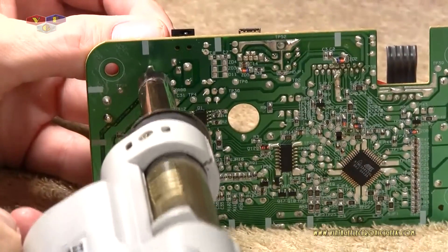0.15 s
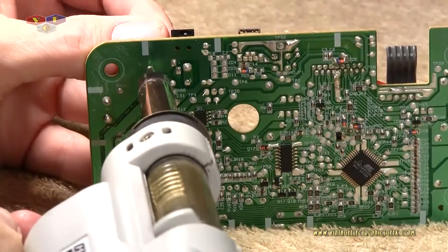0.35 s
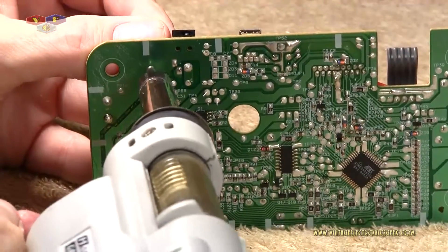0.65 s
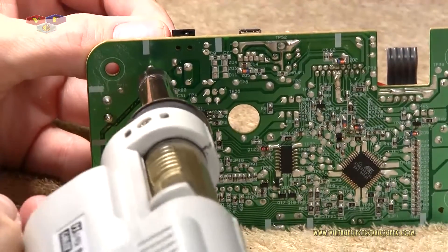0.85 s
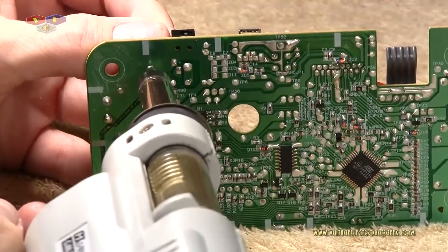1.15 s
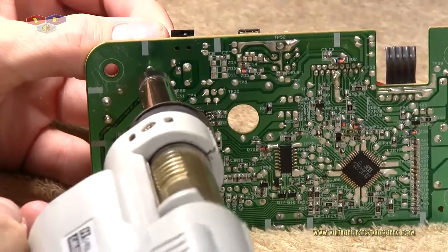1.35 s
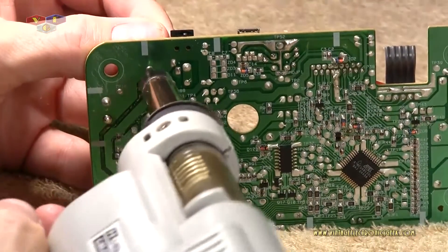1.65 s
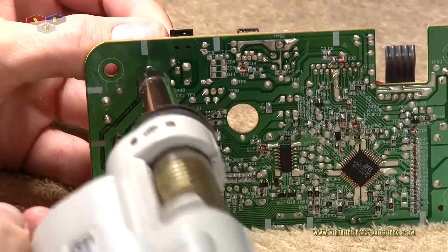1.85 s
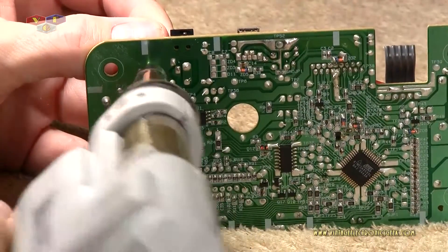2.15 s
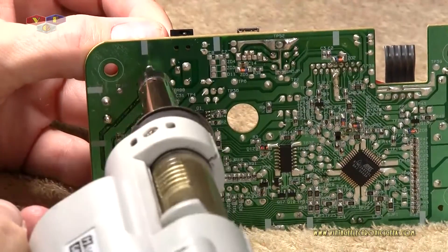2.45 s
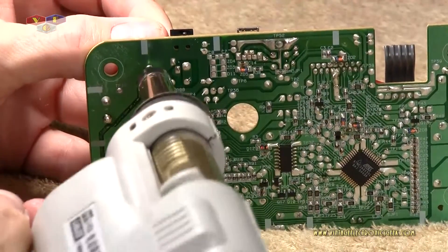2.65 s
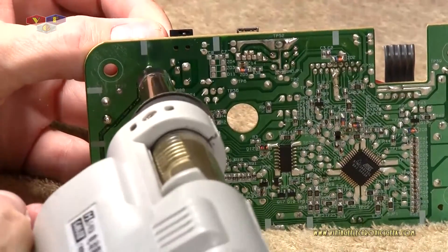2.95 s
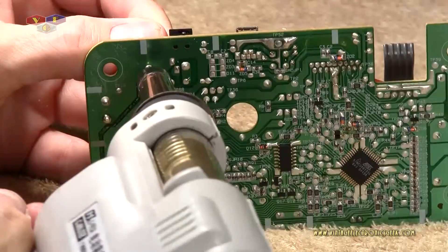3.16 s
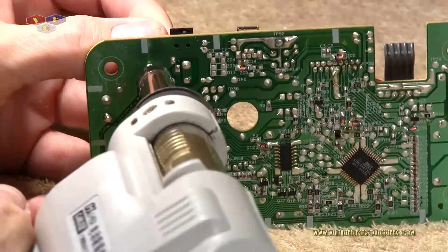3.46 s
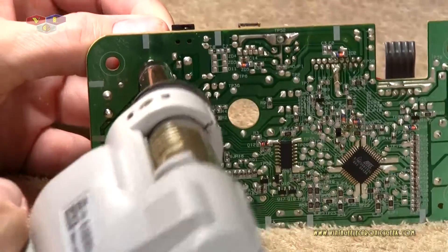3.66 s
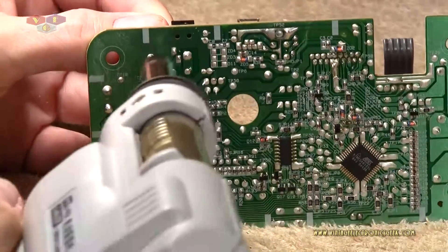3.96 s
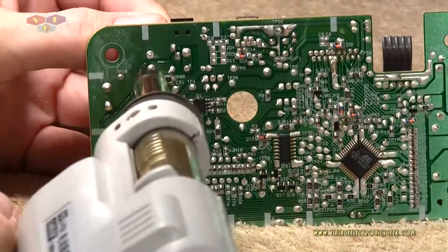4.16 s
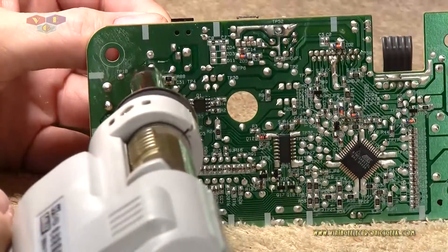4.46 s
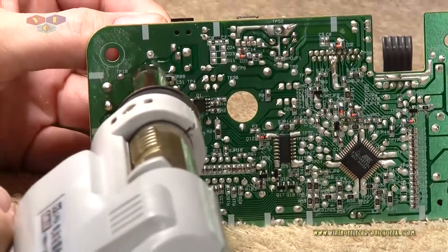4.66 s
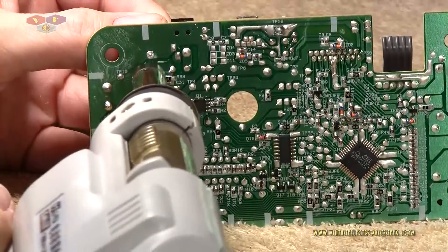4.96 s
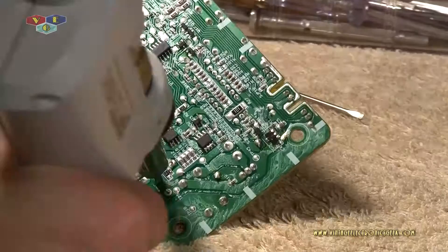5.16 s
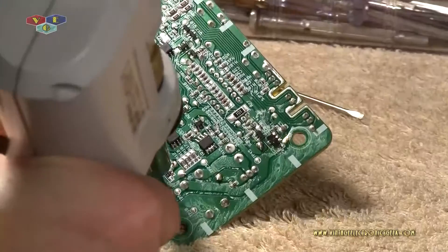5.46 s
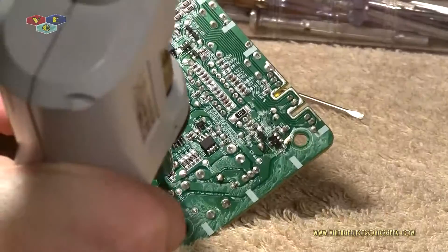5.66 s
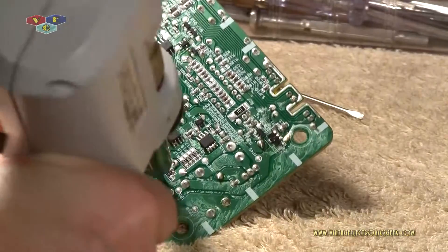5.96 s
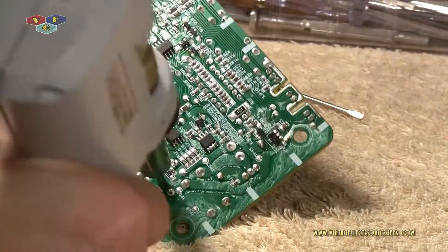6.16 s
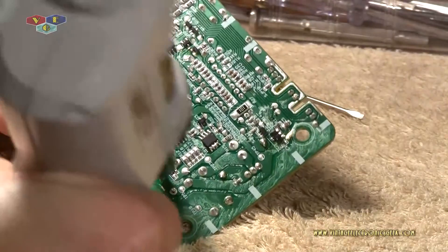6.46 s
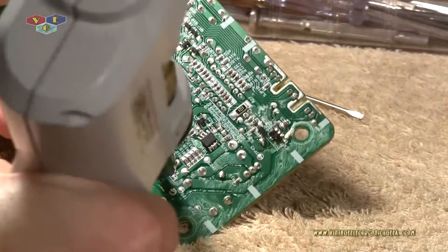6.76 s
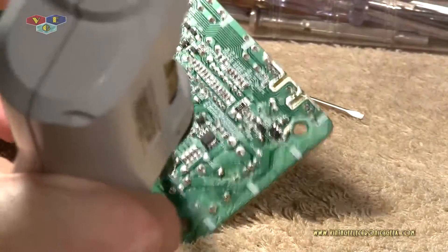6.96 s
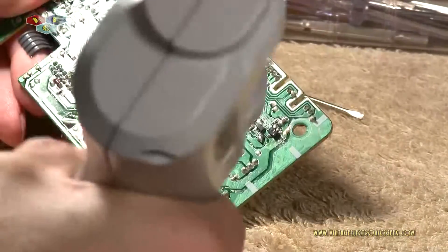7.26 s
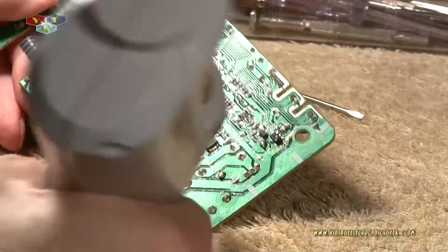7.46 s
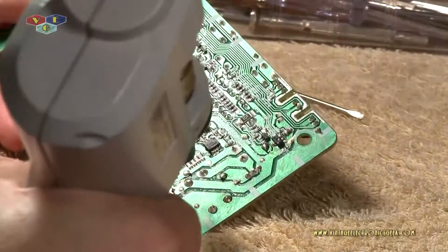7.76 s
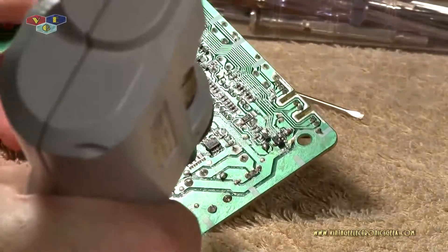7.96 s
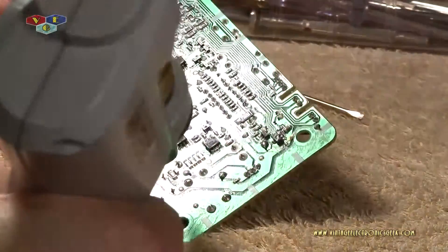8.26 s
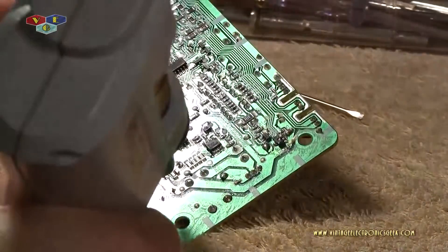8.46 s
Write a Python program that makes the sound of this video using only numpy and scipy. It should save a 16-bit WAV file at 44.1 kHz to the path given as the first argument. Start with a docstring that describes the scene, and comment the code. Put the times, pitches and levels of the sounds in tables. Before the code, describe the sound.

A faint fan hum runs throughout in a small, dry workroom. At about 0.4 seconds a trigger clicks and an electric desoldering gun kicks on with a knock, close to the microphone. Its vacuum pump gives a loud, low buzz of rapid hollow thumps, plastic clatter and air puffs, coasting out by 1 second. Faint circuit board taps come near 1.8 and 2.1 seconds. At 2.7 seconds a click and knock start a second burst, which whistles thinly and labours twice, around 3.1 and 3.4 seconds, as solder plugs the nozzle, then winds down by 3.7. Several light taps follow between 3.8 and 5.2 seconds. After small trigger clicks, the longest burst starts sharply at 5.7 seconds, steadier and slightly different in tone. It slows at 7 seconds and ends in a few weak strokes, leaving only the hum until about 8.5 seconds.

```python
"""An electric desoldering gun runs its diaphragm pump in three bursts, close to a stereo microphone.
Each motor turn thumps the chamber, clacks the valves against the plastic shell and puffs air. The motor
kicks at the start, labours when solder plugs the nozzle and coasts out in a few slow strokes.
The microphone hears two bursts from the gun's top, the last from its side. In between, the trigger
clicks and the nozzle taps the board. Behind it all lies the fan hum of a small workroom."""
import sys
import numpy as np
from scipy import signal
from scipy.fft import rfft, irfft
from scipy.io import wavfile
from scipy.ndimage import uniform_filter1d, minimum_filter1d

SR = 44100
rng = np.random.default_rng(int(sys.argv[2]) if len(sys.argv) > 2 else 0)


def log_audio(samples):
    """Write samples as a 16-bit WAV file to the path given in sys.argv[1]."""
    # one column per channel
    frames = np.atleast_2d(samples).T
    # limit to full scale, then quantise
    limited = np.clip(frames, -1, 1)
    pcm = np.round(limited * 32767).astype(np.int16)
    wavfile.write(sys.argv[1], SR, pcm)


N = 379260
TIME = np.arange(N) / SR

# trigger pulls: first_stroke_s, power_off_s, cruise_hz, climb_hz_per_s, coast_s, rock_gap_s, rock_step_db
BURSTS = [(.4458, .7601, 55.58, 10.16, .1713, .022, -4), (2.7348, 3.4714, 58.05, .09, .1593, .0225, -3.5),
          (5.6875, 7.0084, 57.89, .2, .1169, .035, -8.5)]
# solder plugs dragging the motor down: centre_s, half_length_s, speed_lost_share
PLUGS = [(3.1347, .0352, .3455), (3.3538, .032, .2973), (6.95, .2664, .035)]
# chamber thump, one curve a burst: time_s, relative_db
THUMP_CURVES = [
    [(0.44, -16), (0.444, -14.5), (0.604, -17.5), (0.618, -18.5), (0.652, -18.5), (0.82, -16)],
    [(2.73, -15), (2.978, -21), (3.056, -17), (3.114, -18.5), (3.23, -15), (3.406, -17.5), (3.512, -13),
     (3.53, -16.5)],
    [(5.68, -16), (5.786, -12), (5.914, -18), (5.99, -15), (6.156, -17.5), (6.216, -13.5), (6.236, -16.5),
     (7.04, -14.5)],
]
# inlet valve, piston, outlet valve, diaphragm return: place_turns, thump_db, clatter_db, hiss_db, decay_s
KNOCKS_TOP = [(-.2, -8.5, -3, -0.5, .0025), (0, 0, -1, -5, .0014), (.2, -10, -9, 1, 0.003),
              (.44, -8, -9.5, -13, 0.0047)]
KNOCKS_SIDE = [(-.21, -5.5, -1, -12.5, 0.0051), (0, 0.5, -1, -1, 0.0019), (.2, -10, -8, -2, .004),
               (0.458, -8.5, -7.5, -11.5, 0.0034)]
# colours of chamber, shell and valve hiss from each microphone position: frequency_hz, relative_db
CHAMBER_TOP = [(30, -35), (57, -26.5), (115, -17), (175, -18), (230, -27.5), (290, -19), (400, -10),
               (510, -6), (580, -11), (640, -1), (720, 1.5), (790, 0), (870, -13), (1050, -34), (1600, -40)]
CHAMBER_SIDE = [(30, -49), (57, -27), (115, -21), (175, -18.5), (230, -26.5), (290, -20), (400, -7.5),
                (520, -9.5), (590, -6.5), (640, 2.5), (700, 5.5), (775, 4.5), (870, -12), (1050, -14),
                (1600, -37)]
SHELL_TOP = [(560, -59), (950, -0.5), (1020, 3), (1100, -2.5), (1400, -3.5), (1850, 2), (2180, -9.5),
             (2400, 2), (3030, -8.5), (4350, -5.5), (4700, -6), (5130, -3.5), (6200, -12.5), (6760, -10),
             (7500, -22.5), (9750, -72), (16500, -120)]
SHELL_SIDE = [(530, -35.5), (900, -9), (1120, -3.5), (1370, -10.5), (1530, -2.5), (1700, -9.5), (1910, -1),
              (2220, -10.5), (2450, -6), (2950, -10.5), (3620, -10), (4560, -16), (5310, -13), (6230, -23),
              (7500, -22.5), (9750, -63), (16500, -120)]
HISS_TOP = [(4120, -56), (7000, -7), (8320, -4.5), (9760, 0), (11900, -8.5), (13600, -6.5), (15300, -28),
            (16000, -5)]
HISS_SIDE = [(4120, -15), (7000, -4.5), (8150, -2), (9140, 4.5), (11600, -10), (13600, -7), (15200, -31),
             (16000, -28)]
# air singing in the half-plugged nozzle: centre_s, length_s, pitch_hz, band_gain_db
WHISTLES = [(2.918, .2, 5280, -2), (3.178, 0.037, 2650, -3), (3.377, 0.065, 2600, -1)]
# jerks of the starting motor, and the sharp first valve knock of the last burst: start_s, level_db, decay_s
START_KNOCKS = [(0.417, -4.5, 0.0013), (2.7002, -14.5, 0.0056), (2.7098, -8, 0.004), (5.6538, -4.5, 0.0021),
                (5.679, -18.5, .004)]
# trigger clicks: start_s, level_db
CLICKS = [(0.4105, -23), (2.6922, -20), (5.4472, -25.5), (5.630, -23), (5.649, -19)]
# colours of the start knocks and of the trigger: frequency_hz, relative_db
START_COLOUR = [(20, -29), (60, -19), (150, -14), (300, -8), (520, 5.5), (750, 8.5), (1080, 2.5),
                (1350, -3), (1800, -1.5), (2500, -7.5), (4500, -7.5), (7000, -22), (10000, -19.5),
                (16000, -34)]
TRIGGER_COLOUR = [(300, -36), (900, 5.5), (1500, 6.5), (2300, 10), (2900, 2), (3700, -16), (7000, -5.5),
                  (10000, -16), (16000, -22)]
# taps on the board: start_s, level_db, pitch_hz, decay_s
TAPS = [(1.799, -38.5, 694, 0.013), (2.138, -47, 1900, .004), (3.752, -42.5, 3000, .005),
        (4.044, -33.5, 684, 0.0094), (4.486, -38, 870, 0.0039), (5.148, -39, 1090, .003),
        (5.494, -54, 1500, .005)]
# workroom decay: frequency_hz, t60_s
ROOM_DECAY = [(250, .18), (660, .16), (1700, .2), (4600, .205), (14000, .19)]
# strength of the reflections: frequency_hz, gain_db
REFLECTIONS = [(100, -20), (700, -18), (1500, -12), (5000, -9), (14000, -10)]
# fan and mains tones: pitch_hz, level_db, width_hz, start_s
HUM_TONES = [(56.3, -72, 0.33, 1.5), (178, -64, 5.23, -1.5), (204, -59.5, 2.8, 0.5), (376, -66, 1.3, 0),
             (414, -64, 1.4, 0), (615, -79, 4, -0.5), (1200, -63, 37.2, 0), (1430, -63, 6.6, 5)]
# colour of the room's air: frequency_hz, relative_db
AIR_COLOUR = [(15, -52), (25, -28), (97, -3), (145, -9.5), (161, -3.5), (212, -1.5), (326, -10), (354, -5),
              (451, -11.5), (575, -7), (887, -11.5), (1190, -11.5), (1700, -18), (11600, -29.5),
              (16000, -34)]
# how far the two microphone ports differ: frequency_hz, gain_db
PORT_SPREAD = [(40, -22), (250, -95), (550, -33.5), (1200, -59), (4000, -105), (14000, -59)]


def gun():
    """The running gun at close range, microphone first over its top and then at its side."""
    rows = np.vstack([strokes(burst, curve) for burst, curve in zip(BURSTS, THUMP_CURVES)])
    from_top = rows[:, 0] < 5.2  # seconds
    top = pump(rows[from_top], KNOCKS_TOP, CHAMBER_TOP, SHELL_TOP, HISS_TOP, thump_db=29, clatter_db=8.5,
               hiss_db=-8, loose_share=.14, hiss_s=.0033, rise_s=.00027, drift=.09)
    side = pump(rows[~from_top], KNOCKS_SIDE, CHAMBER_SIDE, SHELL_SIDE, HISS_SIDE, thump_db=28.5,
                clatter_db=7.5, hiss_db=-4, loose_share=.37, hiss_s=.0012, rise_s=.00039, drift=.08)
    return nozzle_whistle(top + side)


def pump(rows, knocks, chamber, shell, hiss, thump_db, clatter_db, hiss_db,
         loose_share, hiss_s, rise_s, drift, jitter_s=.00006, chirp_hz=914):
    """Each knock booms the chamber, rings the shell's dense modes and puffs air through a valve."""
    stroke_s, stroke_thump_db, stroke_clatter_db, length_s = rows.T
    thump, clatter, air = np.zeros((3, N))
    for place, knock_thump_db, knock_clatter_db, knock_hiss_db, decay_s in knocks:
        slip, suction, *scatter = rng.standard_normal((len(rows), 5)).T
        boom_db, clack_db, gust_db = np.array(scatter) * [[.8], [.8], [1.5]]
        # the valves open earlier or later as the suction drifts
        suction = unit_rms(uniform_filter1d(suction, size=7))
        times = stroke_s + place * length_s * (1 + drift * suction) + jitter_s * slip
        thump += impulses(times, stroke_thump_db + knock_thump_db + boom_db)
        shell_db = stroke_clatter_db + knock_clatter_db + clack_db
        valve_db = stroke_clatter_db + knock_hiss_db + gust_db
        # the shell answers alike at every turn; loose parts rattle anew each time
        clatter += np.sqrt(1 - loose_share) * through(impulses(times, shell_db), modes(decay_s, rise_s))
        for s, rattle_db, air_db in zip(times, shell_db, valve_db):
            add(clatter, s, np.sqrt(loose_share) * amp(rattle_db) * puff(decay_s, rise_s))
            add(air, s, amp(air_db) * puff(hiss_s, 2 * rise_s))
    # the chamber shrinks during a stroke, so its upper tones come late and each thump chirps upward
    thump -= 2 * signal.lfilter(*signal.iirpeak(chirp_hz, Q=2.36, fs=SR), thump)
    return (amp(thump_db) * through(thump, body(chamber))
            + amp(clatter_db) * through(clatter, body(shell))
            + amp(hiss_db) * through(air, body(hiss)))


def strokes(burst, thump_curve, surge_s=.078, freed_delay_s=.06, freed_half_s=.048, longest_s=.022):
    """One stroke a motor turn, then the piston settles. Rows: time_s, thump_db, clatter_db, length_s."""
    *motor, rock_gap_s, rock_step_db = burst
    start_s, off_s, _, _, coast_s = motor
    t = np.arange(start_s, off_s + coast_s, 1 / SR)
    turns = np.cumsum(motor_speed(t, *motor)[0]) / SR
    times = np.interp(np.arange(int(turns[-1]) + 1), turns, t)
    speed_hz, spent = motor_speed(times, *motor)
    slack = np.minimum(spent / .19, 1)  # without power the strokes weaken
    thump_db = np.interp(times, *np.transpose(thump_curve)) - 4 * slack
    # the shell clatters harder just after the start, and again as a plug lets go
    surge = np.exp(-(times - start_s) / surge_s)
    freed = sum(lost * np.exp(-((times - s - freed_delay_s) / freed_half_s) ** 2) for s, _, lost in PLUGS)
    clatter_db = 1.5 * surge + 5 * freed - 2 * slack
    rows = np.column_stack([times, thump_db, clatter_db, np.minimum(1 / speed_hz, longest_s)])
    rocks = piston_rocks(times[-1], thump_db[-1], clatter_db[-1], rock_gap_s, rock_step_db)
    return np.vstack([rows[:-1], rocks])


def motor_speed(t, start_s, off_s, cruise_hz, climb_hz_per_s, coast_s, spin_up_s=.0355):
    """The motor spins up, labours at plugs and coasts. Gives turns a second and share lost to coasting."""
    spin_up = 1 - .201 * np.exp(-(t - start_s) / spin_up_s)
    load = np.prod([1 - lost * np.exp(-((t - s) / half_s) ** 2) for s, half_s, lost in PLUGS], axis=0)
    spent = np.clip((t - off_s) / coast_s, 0, 1) ** 2
    free_hz = cruise_hz + climb_hz_per_s * (t - start_s)
    return free_hz * spin_up * load * (1 - spent), spent


def piston_rocks(s, thump_db, clatter_db, gap_s, step_db):
    """The piston tips over once more and rocks back twice; the clatter dies faster than the thump."""
    return [(s + k * gap_s, thump_db - 2.5 + k * step_db, clatter_db - 2.2 + 1.85 * k * step_db,
             .47 * gap_s) for k in range(3)]


def nozzle_whistle(pumping):
    """Molten solder narrows the nozzle, which then rings at one pitch for a moment."""
    out = pumping.copy()
    for centre_s, length_s, hz, db in WHISTLES:
        swell = np.cos(np.pi * np.clip((TIME - centre_s) / length_s, -.5, .5))
        out += amp(db) * swell * signal.lfilter(*signal.iirpeak(hz, Q=12, fs=SR), pumping)
    return out


def start_knocks():
    """Broad blows: the starting motor jerks the gun, and the last burst's first valve knock is sharp."""
    out = np.zeros(N)
    for s, db, decay_s in START_KNOCKS:
        knock = through(modes(decay_s, rise_s=.00014), body(START_COLOUR))
        add(out, s, amp(db) * np.sqrt(SR / 100) * knock)  # level as rms over 10 ms
    return out


def trigger_clicks():
    """The trigger switch snaps just ahead of each burst."""
    out = np.zeros(N)
    for s, db in CLICKS:
        snap = through(modes(decay_s=.0028, rise_s=.00005), body(TRIGGER_COLOUR))
        add(out, s, amp(db) * snap / abs(snap).max())
    return out


def board_taps():
    """Nozzle and fingers tap the board, which answers with a short dull ring."""
    out = np.zeros(N)
    for s, db, hz, decay_s in TAPS:
        colour = [(hz / 4, -24), (hz / 1.3, -13), (hz, 0), (hz * 1.3, -15),
                  (hz * 3, -22), (hz * 7, -33), (hz * 16, -46)]
        tap = through(modes(decay_s, rise_s=.0001), body(colour))
        add(out, s, amp(db) * tap / abs(tap).max())
    return out


def workroom(direct, size=20000, echoes_per_s=3000, first_echo_s=.005):
    """Bench and walls send sparse reflections to the microphone, each band dying at its own speed."""
    echoes = rng.choice([-1., 1.], size) * (rng.random(size) < echoes_per_s / SR)
    echoes *= TIME[:size] > first_echo_s
    hz, t, bands = signal.stft(echoes, SR, nperseg=256)
    bands *= amp(-60 * t / at_hz(ROOM_DECAY, hz)[:, None])
    plain = signal.istft(bands, SR, nperseg=256)[1]
    tail = signal.istft(bands * amp(at_hz(REFLECTIONS, hz))[:, None], SR, nperseg=256)[1]
    return direct + through(direct, tail / np.linalg.norm(plain))


def fan_hum():
    """Fans and mains hum in the background, each tone wavering in phase."""
    out = np.zeros(N)
    for hz, db, width_hz, start_s in HUM_TONES:
        wander = np.cumsum(rng.standard_normal(N)) * np.sqrt(2 * np.pi * width_hz / SR)
        out += amp(db) * np.sqrt(2) * np.sin(2 * np.pi * hz * TIME + wander) * (TIME >= start_s)
    return out


def room_tone():
    """The even rush of air all around the microphone."""
    colour = amp(at_hz(AIR_COLOUR, np.fft.rfftfreq(N, 1 / SR)))
    return amp(-52) * unit_rms(irfft(rfft(rng.standard_normal(N)) * colour, N))


def body(colour, size=4096):
    """Causal impulse response, energy 1, of a body that radiates little below its colour's first point."""
    hz = abs(np.fft.fftfreq(size, 1 / SR))
    gain = amp(at_hz(colour, hz)) * np.minimum(hz / colour[0][0], 1) ** 2
    log_gain = np.log(np.maximum(gain, 1e-4))
    minimum_phase = np.exp(signal.hilbert(log_gain).conj())
    response = np.fft.ifft(minimum_phase).real[:size // 2]
    return response / np.linalg.norm(response)


def modes(decay_s, rise_s, size=4096):
    """The ring of many overlapping modes, equally strong in every broad band, of energy 1."""
    spectrum = rfft(puff(decay_s, rise_s), size)
    band_level = np.sqrt(uniform_filter1d(abs(spectrum) ** 2, size=30))
    ring = irfft(spectrum / band_level)[:size // 2]
    return ring / np.linalg.norm(ring)


def puff(decay_s, rise_s, size=2048):
    """A burst of noise that swells and dies away, of energy 1."""
    t = TIME[:size]
    burst = rng.standard_normal(size) * np.exp(-t / decay_s) * (1 - np.exp(-t / rise_s))
    return burst / np.linalg.norm(burst)


def impulses(times, levels_db, reach=16):
    """Band-limited blows at exact times."""
    out, k = np.zeros(N), np.arange(-reach, reach + 1)
    for sample, gain in zip(times * SR, amp(levels_db)):
        add(out, (int(sample) - reach) / SR, gain * np.sinc(k - sample % 1) * np.hanning(len(k)))
    return out


def amp(db):
    """Decibels to gain."""
    return 10 ** (np.asarray(db) / 20)


def unit_rms(x):
    """Scales to rms 1."""
    return x / np.sqrt(np.mean(x ** 2) + 1e-20)


def at_hz(table, hz):
    """Reads a table on a log-frequency axis."""
    table_hz, values = np.transpose(table)
    return np.interp(np.log(hz + 1), np.log(table_hz + 1), values)


def add(mix, s, sound):
    """Mixes a sound in at time s."""
    part = mix[max(round(s * SR), 0):][:len(sound)]
    part += sound[:len(part)]


def through(x, response):
    """Plays x through an impulse response."""
    return signal.oaconvolve(x, response)[:len(x)]


def scene():
    """Two close microphone ports hear nearly the same gun; the background leans a little to the right."""
    near = workroom(gun() + start_knocks() + trigger_clicks() + board_taps())
    spread = amp(at_hz(PORT_SPREAD, np.fft.rfftfreq(N, 1 / SR)))
    side = irfft(1j * rfft(near) * spread, N) + amp(-16) * room_tone()
    background = (room_tone() + fan_hum()) * amp([[-.15], [.15]])
    return near + np.array([side, -side]) + background


def record(dry, threshold=.8, edge_hz=16000):
    """A fast limiter leans on the tallest peaks, the hardest kicks still clip; then the band limit."""
    allowed = np.minimum(threshold / (abs(dry).max(0) + 1e-9), 1)
    gain = uniform_filter1d(minimum_filter1d(allowed, size=45), size=45) ** .65
    clipped = np.clip(dry * gain, -1, 1)
    lowpass = signal.firwin(511, edge_hz, window=("kaiser", 9), fs=SR)
    return signal.oaconvolve(clipped, lowpass[None], "same")


dry = scene()
out = record(dry)
log_audio(out)
```